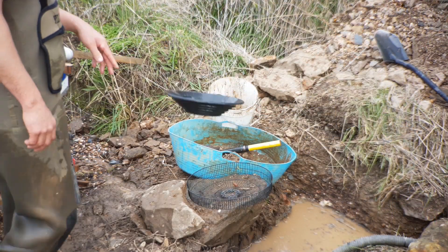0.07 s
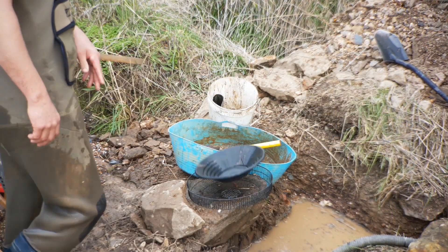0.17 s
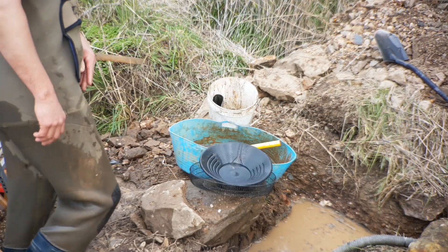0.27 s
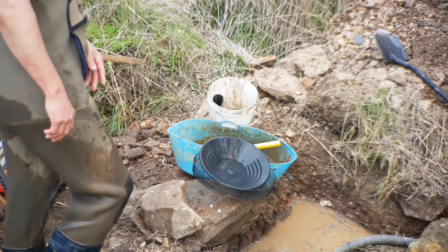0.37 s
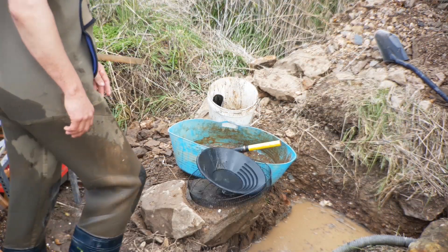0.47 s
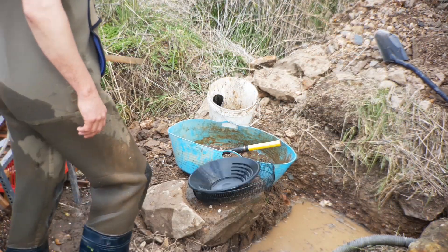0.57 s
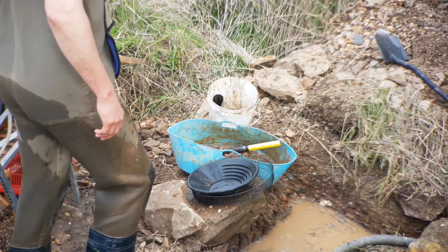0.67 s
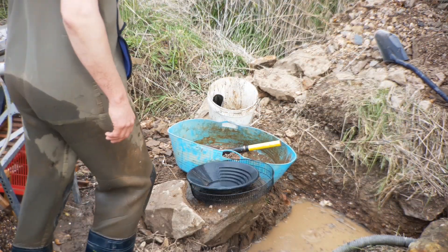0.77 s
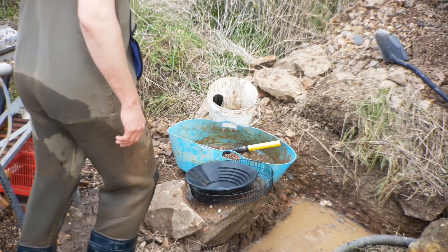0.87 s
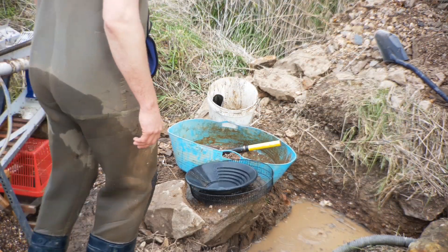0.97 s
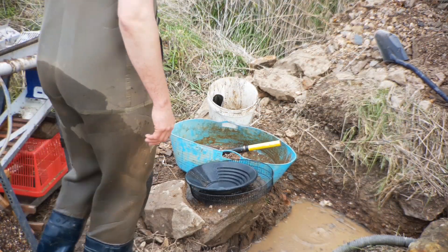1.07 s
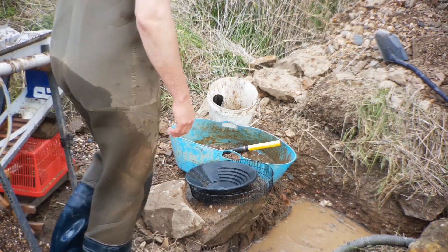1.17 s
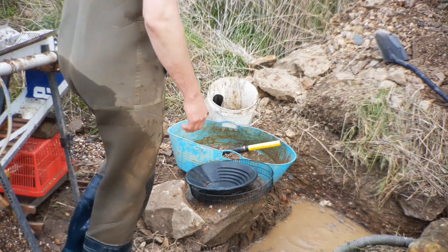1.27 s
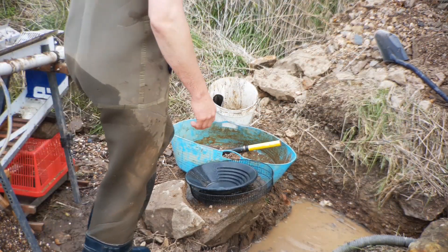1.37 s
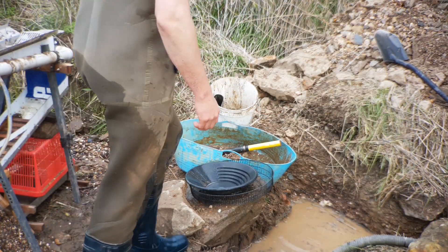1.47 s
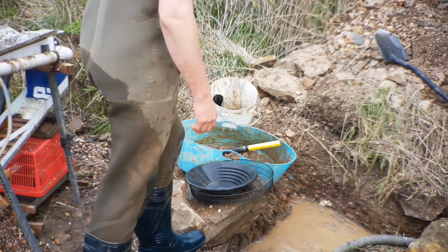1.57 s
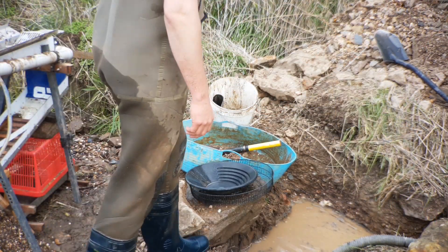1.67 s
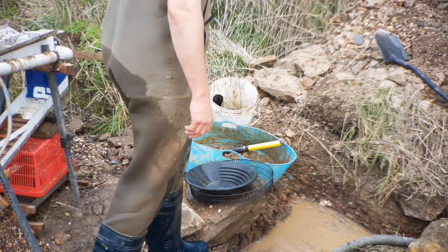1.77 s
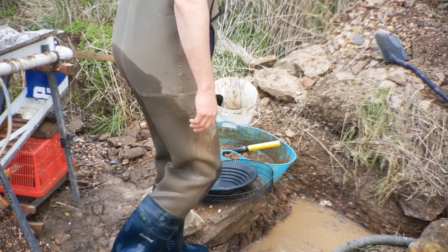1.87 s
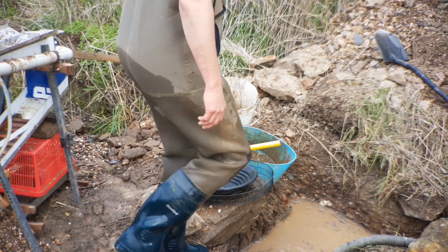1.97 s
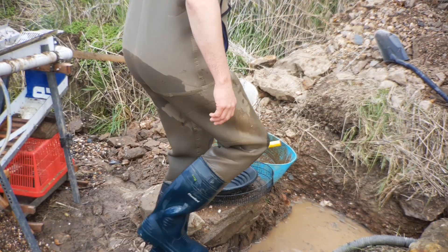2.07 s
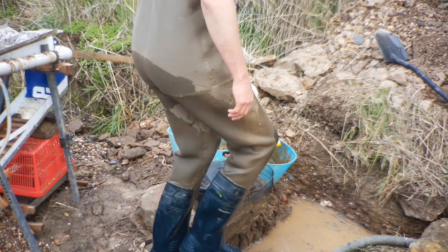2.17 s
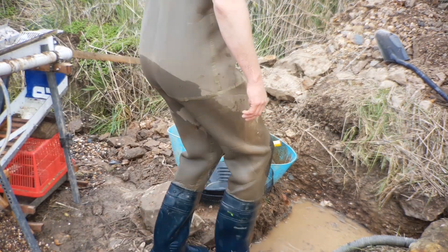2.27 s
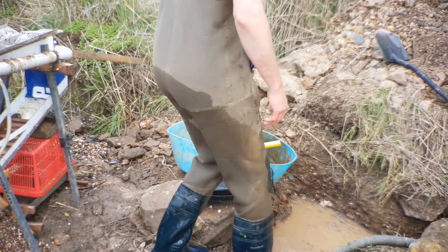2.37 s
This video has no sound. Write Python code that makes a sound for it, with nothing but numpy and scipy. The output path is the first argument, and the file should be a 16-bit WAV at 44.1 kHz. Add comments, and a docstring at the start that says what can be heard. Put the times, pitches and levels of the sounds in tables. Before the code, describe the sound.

A plastic pan clatters onto a wire sieve, bouncing and wobbling to rest outdoors.

```python
"""Quiet outdoor air and the low drone of a far engine come first and stay throughout.
A plastic gold pan is tossed onto a wire sieve lying on a rock: it lands hard, bounces, then wobbles
on its rim to rest. Grit hisses on the shaken mesh and the banks around answer faintly.
Later a rubber boot scuffs stony ground."""
import sys
import numpy as np
from scipy import signal
from scipy.fft import rfft, irfft, next_fast_len
from scipy.io import wavfile
from scipy.ndimage import map_coordinates

SR = 44100
rng = np.random.default_rng(int(sys.argv[2]) if len(sys.argv) > 2 else 0)


def master_out(mix):
    """Clip the mix to full scale and print it as 16-bit PCM to the path in sys.argv[1]."""
    frames = np.transpose(np.atleast_2d(mix))
    ceiling = np.clip(frames, -1, 1)
    pcm = np.round(ceiling * 32767).astype(np.int16)
    wavfile.write(sys.argv[1], SR, pcm)


N = 105840


def amp(db):
    return 10 ** (np.asarray(db) / 20)


def unit_rms(x):
    return x / np.sqrt(np.mean(x ** 2) + 1e-20)


def unit_energy(x):
    return x / np.sqrt(np.sum(x ** 2, axis=-1, keepdims=True) + 1e-20)


def along(points, hz):
    """Interpolate (Hz, value) points on a log axis."""
    point_hz, values = np.transpose(points)
    return np.interp(np.log(hz + 1), np.log(point_hz + 1), values)


def curves(rows):
    """One value per sample for each column after the time."""
    times_s, *columns = np.transpose(rows)
    return [np.interp(np.arange(N) / SR, times_s, column) for column in columns]


def filtered(x, response):
    """Zero-phase filter with gain response(hz)."""
    size = next_fast_len(N + 2048, True)
    return irfft(rfft(x, size) * response(np.fft.rfftfreq(size, 1 / SR)), size)[..., :N]


def coloured(x, points, size=2048):
    """Minimum-phase filter through (Hz, dB) points."""
    gain = amp(along(points, np.fft.rfftfreq(size, 1 / SR)))
    cepstrum = irfft(np.log(gain))
    cepstrum[1:size // 2] *= 2
    cepstrum[size // 2 + 1:] = 0
    impulse = irfft(np.exp(rfft(cepstrum)))[:size // 2]
    length = x.shape[-1]
    padded = next_fast_len(length + size // 2, True)
    return irfft(rfft(x, padded) * rfft(impulse, padded), padded)[..., :length]


def add(track, start_s, sound):
    room = track[..., round(start_s * SR):][..., :sound.shape[-1]]
    room += sound[..., :room.shape[-1]]


def grains(per_s, spread_db):
    """Two trains of tiny random impacts."""
    impacts = (rng.random((2, N)) < per_s / SR) * rng.choice([-1, 1], (2, N))
    return impacts * amp(spread_db * rng.standard_normal((2, N)))


# Air spectrum. Each row: frequency in Hz, gain in dB.
AIR_SPECTRUM = [(15, -45), (25, -21.5), (45, -10.5), (65, -6), (90, -10.5), (240, -16), (389, -20.5),
                (631, -21), (800, -21.5), (1200, -25), (2400, -27.5), (4000, -37.5), (6400, -44),
                (10000, -44.5), (13000, -39.5), (15500, -39)]
# Each row: frequency in Hz, left-right correlation.
AIR_CORRELATION = [(60, 0.83), (500, 0.23), (2000, .4), (8000, .1)]


def air(level_db=-66):
    """Steady outdoor noise, most alike left and right in the bass."""
    def mid_side_gain(hz):
        angle = np.arccos(along(AIR_CORRELATION, hz)) / 2
        return amp(along(AIR_SPECTRUM, hz)) * [np.cos(angle), np.sin(angle)]

    mid, side = filtered(rng.standard_normal((2, N)), mid_side_gain)
    return amp(level_db) * unit_rms(np.array([mid + side, mid - side]))


def far_engine(level_db=-69, drone_hz=64.6):
    """One low tone, wavering slightly in level and pitch."""
    def waver(per_s):
        return map_coordinates(rng.standard_normal(200), [np.arange(N) * per_s / SR], mode="mirror")

    waver_db = 1.3 * waver(per_s=8)
    hz = drone_hz + 1.2 * waver(per_s=7)
    return amp(level_db) * unit_rms(amp(waver_db) * np.sin(2 * np.pi * np.cumsum(hz) / SR))


# Shell modes. Each row: frequency in Hz, relative level in dB, T60 in seconds.
PAN_MODES = [(212.5, -6.5, .06), (244.2, -12.5, 0.22), (362, -2, .08), (419.5, -2.5, 0.059),
             (546.7, -2, .07), (635.7, -4, 0.051), (737.2, -1.5, 0.065), (800, -2.5, 0.071),
             (887, 2, 0.042), (1095, -2, 0.057), (1250, -2.5, 0.021), (1365, -7, .035), (1678, 2, 0.029),
             (1893, 1.5, 0.027), (2760, -10, 0.017)]


def pan_shell(t, favour_db=0, vary_db=2):
    """Direct and scattered ring; the place of contact reweights the modes."""
    hz, level_db, t60_s = np.transpose(PAN_MODES)
    hz = hz * (1 + 0.011 * rng.standard_normal(len(hz)))  # contact stiffens or loads the shell
    modes = amp(-60 * t / t60_s[:, None]) * np.sin(2 * np.pi * np.outer(hz, t))
    signs = rng.choice([-1, 1], (2, len(hz)))
    weights = signs * amp(level_db + favour_db + vary_db * rng.standard_normal(signs.shape))
    return unit_energy(weights @ modes)


# Pan contacts. Each row: start in seconds, level in dB, offsets in dB for bass, edge, snap and
# wire tick, favoured frequency in Hz.
CONTACTS = [(0.2287, -27.5, 4.5, -5, -5, 0, 784), (0.235, -25.5, -9.5, 4, 7, 7, 705),
            (0.2443, -22, -7.5, 1.5, -3, -12, 1430), (0.2514, -26.5, -2, 0, 5, 7, 1260),
            (0.256, -24.5, -2.5, -8, -5, -25, 1090), (0.2992, -32.5, -3, 6.5, 5.5, -4.5, 1490),
            (0.363, -48.5, 4.5, -3, -14, -16, 1090), (0.439, -45.5, 12, -10, -8, -12, 1846),
            (0.443, -35.5, -6, 4, 3, -1, 540), (0.473, -29, 4, 4, -3.5, -17, 1830),
            (0.478, -28.5, 0, -8, -12, -18, 1176), (0.5265, -33, 3, 1, -2.5, -5, 583),
            (0.55, -52.5, 15.5, -10, -11, 6, 413), (0.589, -30.5, -9, 0, 5, -5, 800),
            (0.611, -34.5, 0, 0, -10, -2.5, 635), (0.6302, -31, -5.5, -16, -2, 3, 830),
            (0.638, -38.5, -8, 6, 9, 7, 1810), (0.646, -39, 0.5, -11, -17, -4, 860),
            (0.6753, -47, -5, 11.5, 15, -7, 1950), (0.685, -34.5, -1, -10, 1, 2.5, 804),
            (0.693, -40.5, -6, -6, -12, 2, 800), (0.733, -42.5, 0, 2.5, -1, -19, 1290),
            (0.7395, -40.5, -8, -3, 1, -3.5, 880), (0.765, -40.5, 4.5, -3.5, -1, -7, 577),
            (0.7793, -34.5, -2.5, -10, 1, 4, 910), (0.7858, -38.5, -4, -7, 4.5, -11, 854),
            (0.796, -42.5, -3, 0, 5, -8, 750), (0.818, -61.5, 18.5, 13.5, 7, -3.5, 370),
            (0.842, -45.5, -8, -4.5, -2.5, -15, 885), (0.859, -47.5, 4.5, 0, -1, -9, 840),
            (0.876, -41.5, 0, -4, -2, -9, 672), (0.923, -50, -2, -13, -14, -17, 810)]
# Dense ringing of pan and mesh. Each row: frequency in Hz, gain in dB.
CLATTER_SPECTRUM = [(60, -19.5), (180, -3), (500, 1), (1200, 0.5), (2000, -8), (2900, -4.5), (4600, -16.5),
                    (6000, -13), (7700, -11.5), (10000, -19.5), (13000, -19), (16000, -24)]
# Bass, body, edge, snap and wire tick bands. Each row: level in dB, clatter T60 in seconds.
CONTACT_BANDS = [(-2, 0.082), (1, 0.063), (-3.5, 0.038), (-11, 0.021), (-13.5, 0.018)]
# Edges of those bands in Hz.
CONTACT_EDGES_HZ = [70, 600, 1400, 2400, 4700, 17000]


def pan_contacts(ring_db=2, crack_db=-3, clatter_db=-2, focus_db=11.5, focus_octaves=0.12):
    """Each contact is a crack, the shell's ring and a clatter; its hardness weights five bands."""
    t = np.arange(4096) / SR
    starts_s, level_db, bass_db, edge_db, snap_db, tick_db, focus_hz = np.transpose(CONTACTS)
    octaves_off = np.log2(np.array(PAN_MODES)[:, 0] / focus_hz[:, None])
    favours_db = focus_db * np.exp(-(octaves_off / focus_octaves) ** 2)
    struck = amp(ring_db) * np.array([pan_shell(t, favour_db) for favour_db in favours_db])
    crack = unit_energy(coloured(signal.unit_impulse(len(t)), CLATTER_SPECTRUM))
    struck[:, 0] += amp(crack_db) * crack  # direct path only
    noise = unit_rms(coloured(rng.standard_normal(struck.shape), CLATTER_SPECTRUM))
    offsets_db = [bass_db, 0, edge_db, snap_db, tick_db]
    hits = 0
    for k, (band_db, t60_s) in enumerate(CONTACT_BANDS):
        bandpass = signal.butter(3, CONTACT_EDGES_HZ[k:k + 2], "band", fs=SR, output="sos")
        clatter = amp(clatter_db) * noise * unit_energy(amp(-60 * t / t60_s))
        band = unit_energy(signal.sosfilt(bandpass, struck + clatter))
        hits = hits + amp(level_db + band_db + offsets_db[k])[:, None, None] * band
    out = np.zeros((2, N))
    for start_s, hit in zip(starts_s, hits):
        add(out, start_s, hit * np.sqrt(0.01 * SR))  # level as RMS over 10 ms
    return out


# Rim rolling on the mesh. Each row: time in seconds, rumble level in dB, grit level in dB.
ROLL_LEVELS = [(.22, -84, -86), (.25, -39, -35), (.3, -43.5, -48), (.35, -64, -68), (.42, -68, -71),
               (.47, -64, -51), (.56, -44.5, -53.5), (.64, -40, -49.5), (.71, -51, -65), (.78, -39.5, -52),
               (.83, -51.5, -65), (.89, -41, -68.5), (.91, -54.5, -68), (.95, -50, -73), (1.0, -61, -84.5),
               (1.06, -64.5, -83.5), (1.13, -82, -95)]
# Rumble spectrum. Each row: frequency in Hz, gain in dB.
RIM_SPECTRUM = [(60, -20.5), (200, -3.5), (400, 1), (850, -4), (1300, -9.5), (2000, -10.5), (3000, -16.5),
                (4500, -26.5), (15000, -50)]


def rolling_rim(bump_over_ring_db=2):
    """The rim bumps over the wires and keeps the shell ringing."""
    rumble_db, _ = curves(ROLL_LEVELS)
    bumps = grains(per_s=350, spread_db=4)
    shell = pan_shell(np.arange(SR // 6) / SR, vary_db=0.5)
    ring = signal.fftconvolve(bumps, shell, axes=1)[:, :N]
    rumble = unit_rms(ring) + amp(bump_over_ring_db) * unit_rms(bumps)
    return amp(rumble_db) * unit_rms(coloured(rumble, RIM_SPECTRUM))


# Grit spectrum. Each row: frequency in Hz, gain in dB.
GRIT_SPECTRUM = [(300, -30), (1500, -1), (2900, 2.5), (4500, -3), (7500, -3.5), (9500, -10), (12500, -2),
                 (15500, -7.5)]


def grit():
    """Grit slides and hisses on the shaken mesh."""
    _, grit_db = curves(ROLL_LEVELS)
    return amp(grit_db) * unit_rms(coloured(grains(per_s=5000, spread_db=3.5), GRIT_SPECTRUM))


# Bank decay. Each row: frequency in Hz, T60 in seconds.
BANK_DECAY = [(150, .4), (1000, 0.51), (3000, .38), (8000, 0.88), (15000, 0.32)]
# Bank answer. Each row: frequency in Hz, gain in dB.
BANK_SPECTRUM = [(100, -13), (400, -18.5), (1200, -18.5), (3000, -10), (7000, -18.5), (14000, -8)]


def banks(source, rise_s=0.006):
    """Rocks and banks answer diffusely, each frequency dying at its own rate."""
    hz, frame_s, spectra = signal.stft(rng.standard_normal((2, SR * 2 // 3)), SR, nperseg=256)
    decay = amp(-60 * frame_s / along(BANK_DECAY, hz)[:, None])
    _, tail = signal.istft(spectra * decay, SR, nperseg=256)
    tail = coloured(unit_energy(tail), BANK_SPECTRUM)
    tail *= 1 - np.exp(-np.arange(tail.shape[1]) / SR / rise_s)
    return signal.fftconvolve(source, tail, axes=1)[:, :N]


# Thuds. Each row: start in seconds, level in dB.
ROCK_THUDS = [(0.239, -28), (0.251, -28), (.365, -45.5), (.478, -53), (0.641, -41.5)]


def rock_thuds(hz=113, t60_s=0.1, rise_s=0.005):
    """The rock takes the weight of the landing with dull thuds."""
    t = np.arange(SR // 4) / SR
    envelope = amp(-60 * t / t60_s) * (1 - np.exp(-t / rise_s))
    out = np.zeros(N)
    for start_s, level_db in ROCK_THUDS:
        add(out, start_s, amp(level_db) * envelope * np.sin(2 * np.pi * hz * t))
    return out


# Scuff. Each row: time in seconds, level in dB.
SCUFF_LEVELS = [(1.68, -87.5), (1.755, -68), (1.79, -78.5), (1.84, -72.5), (1.89, -67.5), (1.96, -72),
                (2.06, -75), (2.15, -84.5), (2.27, -76.5), (2.4, -84)]
# Stone clicks. Each row: start in seconds, level in dB.
STONE_CLICKS = [(1.8525, -62.5), (1.8952, -61), (2.318, -75), (2.375, -76)]
# Stone and sole spectra. Each row: frequency in Hz, gain in dB.
STONE_SPECTRUM = [(80, -21.5), (500, -2), (1500, -1), (2600, 0), (4000, -6), (5500, -12.5), (8000, -13.5),
                  (10000, -25), (15000, -29.5)]
SOLE_SPECTRUM = [(60, -16.5), (220, -2.5), (700, -1), (1500, -8), (4000, -26), (15000, -48.5)]


def boot(sole_db=-1.5, sole_lag_s=0.029, click_t60_s=0.012):
    """Grit scuffs and stones click under the boot; the soft sole follows."""
    scuff_db, = curves(SCUFF_LEVELS)
    out = amp(scuff_db) * unit_rms(coloured(grains(per_s=2300, spread_db=5.5), STONE_SPECTRUM))
    sole = unit_rms(coloured(grains(per_s=1500, spread_db=4)[0], SOLE_SPECTRUM))
    add(out, sole_lag_s, amp(scuff_db + sole_db) * sole)
    t = np.arange(SR // 20) / SR
    for start_s, level_db in STONE_CLICKS:
        burst = rng.standard_normal((2, len(t))) * amp(-60 * t / click_t60_s)
        click = unit_energy(coloured(burst, STONE_SPECTRUM)) * np.sqrt(0.005 * SR)  # RMS 1 over 5 ms
        add(out, start_s, amp(level_db) * widen(click))
    return out


# Stereo width. Each row: frequency in Hz, side gain in dB.
SIDE_GAIN = [(100, -23.5), (600, -16.5), (1500, -11), (3000, -7.5), (7000, -4.5), (15000, -4)]


def widen(pair):
    """Left and right from a direct and a scattered sound; the treble is wider."""
    direct, scattered = pair
    side = coloured(scattered, SIDE_GAIN)
    return np.array([direct + side, direct - side])


# Balance of the near sounds. Each row: frequency in Hz, left minus right in dB.
NEAR_BALANCE = [(60, 1.5), (380, -2.5), (2400, -2), (4400, -5.5), (7400, -10.5), (9300, -0.5), (11000, 2),
                (15000, 2)]


def scene():
    """Pan, sieve and boot close by, over air and engine."""
    pan_and_sieve = widen(pan_contacts() + rolling_rim()) + grit()
    near = pan_and_sieve + banks(pan_and_sieve) + rock_thuds() + boot()
    near = filtered(near, lambda hz: amp(np.outer([0.5, -0.5], along(NEAR_BALANCE, hz))))
    return near + air() + far_engine()


def record(dry, cutoff_hz=15800):
    """Steep low-pass on the top treble."""
    return filtered(dry, lambda hz: 1 / np.sqrt(1 + (hz / cutoff_hz) ** 300))


dry = scene()
out = record(dry)
master_out(out)
```